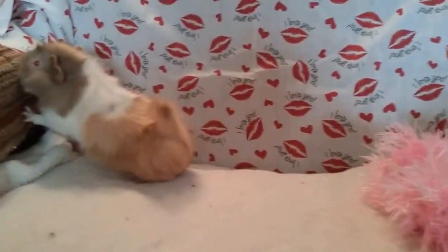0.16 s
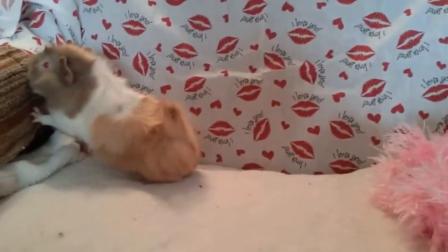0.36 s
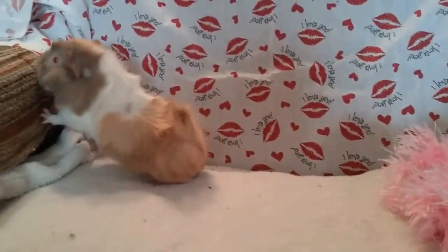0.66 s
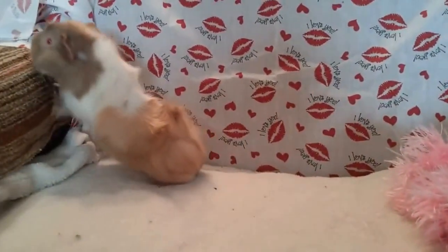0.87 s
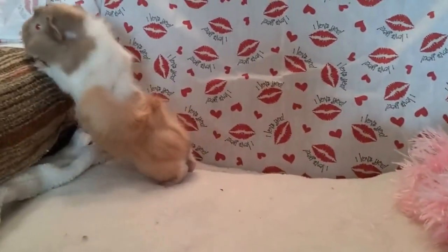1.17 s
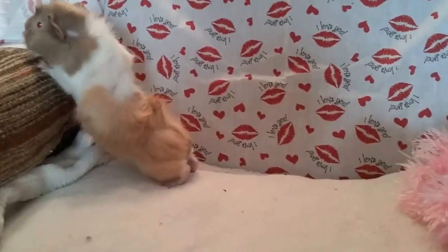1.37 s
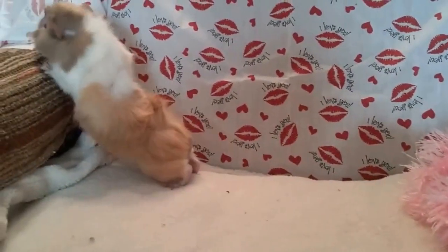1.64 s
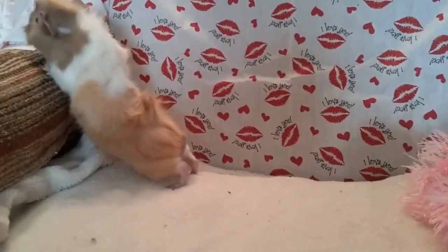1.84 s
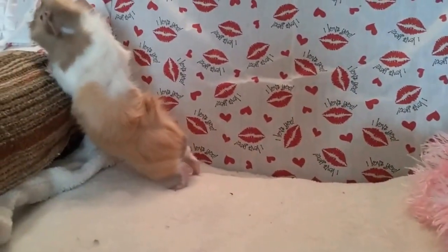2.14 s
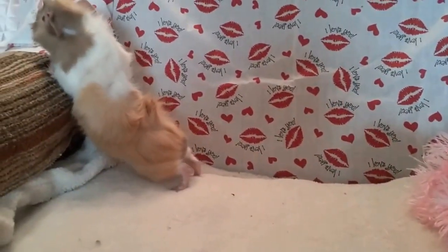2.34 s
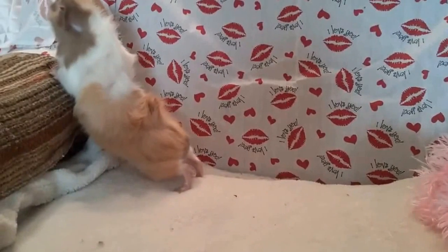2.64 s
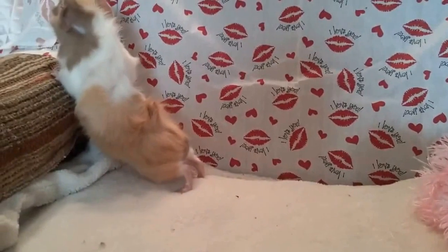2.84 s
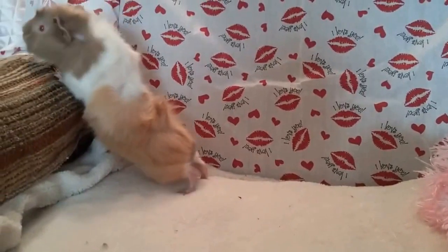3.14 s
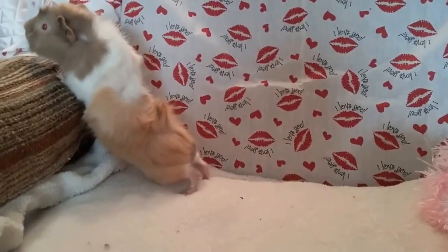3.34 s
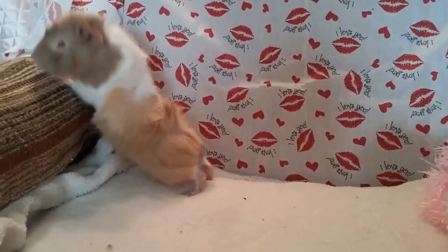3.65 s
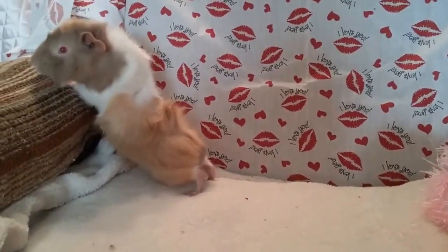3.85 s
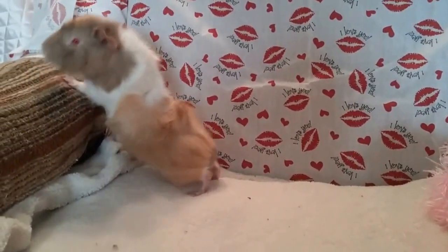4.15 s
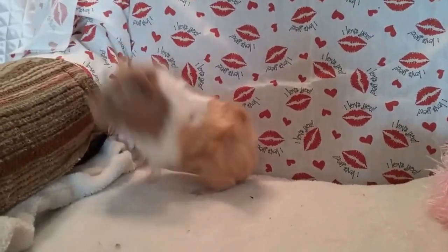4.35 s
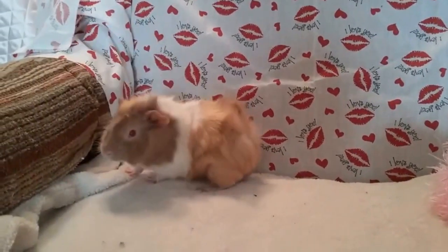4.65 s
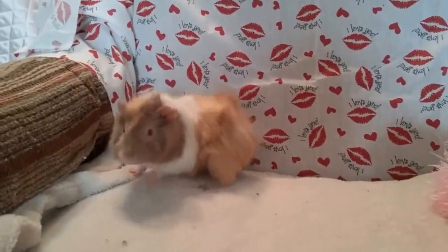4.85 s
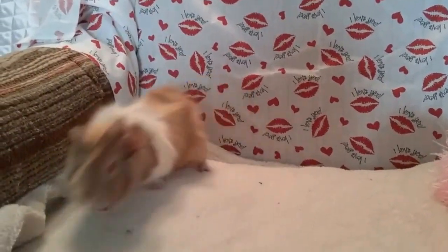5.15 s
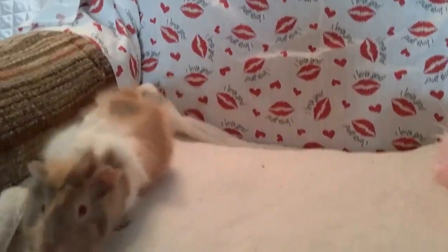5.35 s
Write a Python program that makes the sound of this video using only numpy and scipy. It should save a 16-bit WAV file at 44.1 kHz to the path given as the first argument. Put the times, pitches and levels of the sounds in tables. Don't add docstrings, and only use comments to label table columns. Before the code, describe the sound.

Close and dry, a guinea pig gives about three calls a second, some only low purring hums, others gliding up to piercing whistles. A kid goat further off bleats briefly early on, then twice at length in a fast throb mid-way, and in short bursts at the end. Claws tick and paws thump near four and a half seconds. Small soft room, phone microphone, faint hum and hiss.

```python
import sys
import numpy as np
from scipy import signal
from scipy.io import wavfile
from scipy.ndimage import uniform_filter1d

SR = 44100
rng = np.random.default_rng(int(sys.argv[2]) if len(sys.argv) > 2 else 0)


def how_loud(loudness_db):
    steps = np.asarray(loudness_db, float) / 20
    return 10 ** steps


def to_wav(sig):
    pcm = np.clip(np.atleast_2d(sig), -1, 1) * 32767
    pcm = np.round(pcm).astype(np.int16)
    wavfile.write(sys.argv[1], SR, pcm.T)


N = 242991


def curve(rows, hz):
    f, db = np.transpose(rows)
    return how_loud(np.interp(np.log(hz), np.log(f), db))


def hiss(size):
    return rng.standard_normal(size)


def band(x, lo_hz, hi_hz, order=2):
    y = signal.sosfilt(signal.butter(order, [lo_hz, hi_hz], "band", fs=SR, output="sos"), x)
    return y / np.std(y)


def walk(rate, size):
    hold = int(SR / rate)
    levels = np.repeat(hiss(size // hold + 1), hold)
    slewed = uniform_filter1d(uniform_filter1d(levels, hold), hold)
    return 1.262 * slewed[:size]


def add(out, s, x):
    i = int(s * SR)
    out[i:i + len(x)] += x[:len(out) - i]


def background(animals):
    # (f/Hz, level/dB per Hz)
    spectrum = [(15, -39), (25, 2), (117, -12), (180, -16.5), (229, -6), (309, -4.5), (463, -17),
                (2350, -25), (4870, -32), (14800, -30.5), (16000, -38)]
    # (t/s, rumble rise/dB, width/s)
    knocks = [
        (.03, 9, 0.028),
        (.2, 10, 0.019),
        (.74, 2.5, 0.17),
        (3.388, 1, 0.1),
        (4.191, 10.5, 0.061),
        (4.29, 3.5, 0.062),
        (4.62, 12, 0.066),
        (5.39, 14, 0.056),
        (5.51, 7, 0.034),
    ]
    rumble_base_db, rumble_duck_db = -44, 7
    hiss_base_db, hiss_duck_db = -55.5, 13.5
    gate_shut_db, gate_range_db, gate_s = -74, 10, 0.025
    hum_hz, hum_db = 175, -6

    t = np.arange(N) / SR
    width = int(gate_s * SR)
    heard_db = 10 * np.log10(np.abs(uniform_filter1d(animals ** 2, width)) + 1e-12)
    shut = uniform_filter1d(np.clip(3.5 - (heard_db - gate_shut_db) / gate_range_db, 0, 1), width)
    rumble_db = rumble_base_db - rumble_duck_db * shut
    rumble_db += sum(db * np.exp(-((t - s) / w) ** 2) for s, db, w in knocks)

    motor = np.sin(2 * np.pi * hum_hz * t + 1.8 * walk(30, N))
    out = how_loud(rumble_db + hum_db + 2.62 * walk(25, N)) * motor
    for hz in 35 * 2 ** np.arange(0, 9, .5):
        if hz < 270:
            gate_db = rumble_db + 20.5
        else:
            duck_share = 0.98 if hz > 3000 else 1
            gate_db = hiss_base_db - hiss_duck_db * shut * duck_share + 29
        noise = band(hiss(N), hz / 0.99, hz * 1.315)
        out += how_loud(gate_db - 47 + 4.0 * walk(17, N)) * curve(spectrum, hz) * np.sqrt(hz) * noise
    return out


def paws():
    # (t/s, peak level/dB, ring f/Hz, snap level/dB)
    ticks = [
        (0.315, -32, 1940, -17),
        (0.496, -24.5, 2760, -41),
        (0.979, -29.5, 2600, -19),
        (1.281, -39, 2290, -40),
        (3.515, -28.5, 3110, -28),
        (4.249, -24.5, 700, -35),
        (4.563, -18, 1120, -36),
        (4.58, -13.5, 700, -27),
        (4.815, -27.5, 496, 7),
    ]
    # (t/s, peak level/dB, f/Hz, t60/s)
    thumps = [(0, -37, 2450, 0.095), (0.318, -53, 2760, 0.35), (.97, -42.5, 3520, 0.075),
              (3.321, -53.5, 3270, 1), (4.561, -62, 1200, 0.12), (4.191, -33.5, 166.2, 0.2),
              (4.253, -46, 108, 0.15), (4.565, -30, 312, 0.16), (4.612, -30.5, 75, 0.35),
              (5.369, -27.5, 192, 0.11), (5.392, -50, 119, .15)]
    snap_s, ring_s = .0012, .0016
    out, t = np.zeros(N), np.arange(SR // 3) / SR
    for s, db, hz, snap_db in ticks:
        snap = hiss(len(t)) * np.exp(-t / snap_s)
        ring = np.sin(2 * np.pi * hz * t) * np.exp(-t / ring_s)
        add(out, s, how_loud(db) * (how_loud(snap_db) * snap + ring))
    for s, db, hz, t60 in thumps:
        body = band(hiss(len(t)), hz / 1.27, hz * 1.24)
        rise = 1 - np.exp(-t / (0.014 * t60))
        add(out, s, how_loud(db) * body * rise * np.exp(-t * np.log(1000) / t60))
    return out


def phrase(start, hum, glide, whistle, last_hz, hum_hz, hum_db, top_db, lead, tilt_db, turn_hz, bend, whistle_db):
    creep_oct_per_s, glide_bend = 3.2, 0.4
    onset_db, swell_s, fade_db_per_s = -2.5, 0.06, 163
    hum_tilt_db = -24
    whistle = max(whistle, 1e-3)
    knots = np.cumsum([0, hum, glide, whistle])
    t = np.linspace(0, knots[-1], num=60)
    in_whistle = t - knots[2]

    knee_hz = min(last_hz, turn_hz)
    steps = np.array([1, 2 ** (creep_oct_per_s * hum), knee_hz / hum_hz]) ** glide_bend
    octaves = np.log2(np.interp(t, knots[:3], steps)) / glide_bend
    octaves += np.log2(last_hz / knee_hz) * np.clip(in_whistle / whistle, 0, 1) ** bend

    loudest = knots[-1] - lead
    db = hum_db + onset_db * np.clip(1 - t / hum, 0, 1)
    db += (top_db - hum_db) * np.clip(1 + (t - loudest) / swell_s, 0, 1)
    db -= fade_db_per_s * np.clip(t - loudest, 0, None)

    opened = last_hz > turn_hz
    tilt = np.interp(t, knots, [tilt_db + hum_tilt_db, tilt_db + hum_tilt_db / 2, tilt_db, tilt_db])
    tilt += opened * (whistle_db - tilt_db) * np.clip(in_whistle / 0.0071, 0, 1)
    purr = np.interp(t, knots, [-1.5, -1.5, -17.5, -28.5])
    return np.transpose([start + t, hum_hz * 2 ** octaves, db, tilt, purr])


def wheek(rows, lips_hz):
    # (f/Hz, level/dB)
    snout = [(800, -0.5), (1600, 4), (2600, 2.5), (4000, 3.5), (6000, 4.5), (8500, -10.5), (12000, -11),
             (15000, 1)]
    flick_s, start_s, end_s = .007, .008, .011
    s, *columns = np.transpose(rows)
    t = np.arange(s[0], s[-1] + 0.015, 1 / SR)
    size = len(t)
    _, db, tilt_db, purr_db = (np.interp(t, s, c) for c in columns)
    hz = uniform_filter1d(np.exp(np.interp(t, s, np.log(columns[0]))), size=500, mode="nearest")
    high = np.clip((hz - 1800) / 900, 0, 1)
    flick = high * np.clip((t - s[-1]) / flick_s, 0, 1) ** 2
    waver = .008 * walk(45, size) + .006 * walk(200, size)
    jitter = .016 * np.clip((1300 - hz) / 500, 0, 1) * walk(155, size)
    hz = hz * (1 + 0.15 * flick + waver + jitter)
    phase = 2 * np.pi * np.cumsum(hz) / SR

    voice = np.sin(phase)
    mouth = np.clip((hz - 2150) / 200, .03, 1)
    bright = np.clip((hz - lips_hz) / 250 + .5, .1, 1) ** 2
    for k in np.arange(1.5, 9, .5):
        by_mouth = bright ** (k / 2) * how_loud(tilt_db * (k - 1) ** 0.22)
        by_nose = how_loud(tilt_db / 4 - 2.8 * k) / (1 + (k * hz / 2500) ** 10)
        passed = how_loud(4.5 * walk(40.6, size)) * np.maximum(by_mouth, by_nose)
        share = 1 if k % 1 == 0 else how_loud(purr_db - 1) * np.clip((1000 - hz) / 300, 0, 1)
        voice += (k * hz < 16000) * share * passed * curve(snout, k * hz) * np.sin(k * phase)

    breath = (1 - 1.24 * high) * how_loud(purr_db - 8) * band(hiss(size), 220, 2500, order=5)
    edges = np.clip(np.minimum((t - t[0]) / start_s, (t[-1] - t) / end_s), 0, 1)
    db = db - 8 * np.clip((hz - 1300) / 800, 0, 1) * (1 - mouth)
    flutter_db = 1.5 * walk(90, size)
    return np.sqrt(2) * how_loud(db + flutter_db - 1.6 * flick) * edges * (voice + breath)


def guinea_pig():
    # (start t/s, hum/s, glide/s, whistle/s, last pitch f/Hz)
    wheeks = [(.105, 0.038, 0.089, 0.00092, 1003), (.43, 0.049, 0.084, .001, 974),
              (.76, 0.068, 0.11, 0.042, 3130), (1.104, .1, .045, .001, 1470),
              (1.394, 0.05, 0.043, .001, 884), (1.635, .075, 0.12, 0.08, 2890),
              (2.028, 0.041, 0.089, 0.091, 2900), (2.39, 0.052, 0.034, .001, 1080),
              (2.57, 0.084, 0.095, 0.093, 3060), (2.96, 0.053, 0.14, .04, 2798),
              (3.31, .075, .075, .001, 1654), (3.63, 0.078, 0.037, .001, 886),
              (3.94, 0.066, 0.035, 0.0015, 958), (4.19, 0.09, .07, 0.032, 2790),
              (4.45, .07, .086, 0.13, 3108), (4.905, .075, 0.076, 0.088, 2962),
              (5.3, .015, .12, .056, 2752)]
    # (hum f/Hz, hum level/dB, loudest level/dB, loudest before the end/s, overtone tilt of
    # the glide/dB at twice the pitch)
    voices = [(516, -49, -48.5, 0.023, -2), (530, -48, -46, .01, -1), (568, -43, -41.5, 0.056, -4),
              (575, -48, -44.5, 0.05, -9), (530, -49, -46, 0.013, -17), (585, -48, -19.5, 0.03, 17),
              (575, -38, -20.5, 0.077, -9), (657, -36, -46.5, 0.037, 42), (648, -41.5, -13.5, 0.063, -5),
              (575, -39, -26, 0.022, -3.5), (490.7, -46, -42.5, 0.041, 30.5),
              (490.7, -49, -45.5, 0.0045, 32), (490, -50, -42, 0.017, 36), (514, -42.5, -45.5, 0.024, -11),
              (472, -41, -22, 0.031, 9), (584, -41.5, -29, 0.014, 0.5), (702, -37.5, -18, 0.052, -3)]
    # (f/Hz where the glide turns to a whistle, bend of the whistle [under 1 = levels off],
    # f/Hz where the lips part, overtone tilt of the whistle/dB at twice the pitch)
    mouths = [(2250, 1, 1900, -11), (2250, 1, 1900, -11), (2220, 0.99, 2500, -15), (2250, 1, 1900, -11),
              (2250, 1, 1900, -11), (2300, 0.38, 2396, -14.5), (2188, 1.7, 1450, -18), (2250, 1, 1900, -11),
              (2300, .42, 2200, -12.5), (2600, 1, 1270, -12), (2250, 1, 1900, -11), (2250, 1, 1900, -11),
              (2250, 1, 1900, -11), (2214, 1.05, 1740, -19), (2025, .85, 1986, -3.5),
              (2080, .9, 1690, -2.5), (2325, .9, 1050, -14.5)]
    out = np.zeros(N)
    for call, voice, (turn_hz, bend, lips_hz, whistle_db) in zip(wheeks, voices, mouths):
        add(out, call[0], wheek(phrase(*call, *voice, turn_hz, bend, whistle_db), lips_hz))
    return out


def resonance(hz, centre_hz, width_hz):
    return 1 / np.sqrt(1 + ((hz ** 2 - centre_hz ** 2) / (hz * width_hz)) ** 2)


def bleat(throbs, rise, fall, sag_up, sag_down, hold, dip_db, tongue_db, palate_db, treble_db, rough):
    # (f/Hz, width/Hz, level/dB)
    cavities = [(2600, 700, -4), (3700, 700, -3), (5700, 1200, -2), (7600, 1500, -9), (12500, 6000, -24)]
    shape_db = [tongue_db, palate_db, treble_db, treble_db, treble_db]
    peak, pitch_hz, peak_db, jaw_hz = np.transpose(throbs)
    t = np.arange(peak[0] - rise, peak[-1] + 2 * fall, 1 / SR)
    size = len(t)
    db = np.interp(t, peak, peak_db)

    lag = t - peak[:, None]
    pushes = np.sin(np.pi / 2 * np.clip(1 - np.where(lag < 0, -lag / rise, lag / fall), 0, 1))
    push = pushes.max(0)
    falling = lag[pushes.argmax(0), np.arange(size)] > 0
    slack = uniform_filter1d(np.clip(1 - push / hold, 0, 1), size=200)
    weak = np.clip((peak_db.max() - db - 8.5) / 15, 0, 1)
    hoarse = np.clip(rough + 1.087 * slack + weak, 0, 1)
    sag = uniform_filter1d(np.where(falling, sag_down, sag_up) * slack, size=300)
    wobble = 1 + .035 * hoarse * walk(250, size) + .018 * rough * walk(40.02, size)
    pitch = np.interp(t, peak, pitch_hz) * (1 - sag) * wobble
    phase = 2 * np.pi * np.cumsum(pitch) / SR
    jaw = (1 - slack) * np.interp(t, peak, jaw_hz) + slack * 1600

    def throat(hz):
        lower = (1 + 0.66 * slack) * resonance(hz, jaw, 195) ** 1.193 * np.minimum(hz / jaw, 1) ** 4.0
        lower = lower + how_loud(-29.0) * resonance(hz, 640, 140)
        return lower + sum(how_loud(g + d) * resonance(hz, f, w) ** 2 for (f, w, g), d in zip(cavities, shape_db))

    voice = 0
    for k in range(1, 27):
        shimmer_db = 3.1 * walk(15.2, size) + 8 * rough * walk(70, size)
        shimmer_db -= (2.9 * rough + .5 * slack) * k
        voice = voice + how_loud(shimmer_db) * throat(k * pitch) * np.cos(k * phase + .13 * k * k)
    voice = voice * (1 - 0.6 * hoarse)
    for hz in 900 * 2 ** np.arange(0, 4.1, 1 / 3):
        puff = (1 + np.cos(phase)) * band(hiss(size), hz / 1.13, hz * 1.13)
        voice = voice + .17 * hoarse * (hz / 2600) ** .75 * throat(hz) * puff

    edges = np.clip(np.minimum((t - t[0]) / (0.91 * rise), (t[-1] - t) / fall), 0, 1)
    effort = edges * (how_loud(dip_db) + (1 - how_loud(dip_db)) * push ** 2)
    lumps_db = 7.1 * rough * walk(78.9, size)
    return t[0], how_loud(db + lumps_db) * effort * voice


def kid_goat():
    # (peak t/s, pitch f/Hz, level/dB, jaw resonance f/Hz)
    bleats = [
        [(.582, 637, -24.5, 640), (.69, 629, -16, 1230), (.775, 573, -31.5, 1510)],
        [(2.198, 665, -19.5, 1380), (2.295, 654.2, -13, 1710), (2.395, 673.7, -15, 1750),
         (2.498, 686.7, -16.5, 1580), (2.603, 666.6, -16, 1710), (2.706, 671.6, -16, 1620)],
        [(3.575, 497, -34, 567), (3.655, 593.3, -11.5, 1606), (3.75, 596.2, -11, 1734),
         (3.85, 590, -12.5, 1640), (3.945, 605, -13.5, 1685), (4.045, 618.4, -16, 1560)],
        [(5.12, 617, -29, 1400), (5.215, 629, -22.5, 1426)],
        [(5.28, 420.3, -33, 454)],
        [(5.467, 615.6, -15.5, 2300)],
    ]
    # (rise/s, fall/s, pitch sag before [0-1], pitch sag after [0-1],
    # effort that holds the pitch [0-1])
    breaths = [(.05, .03, .25, 0.4, 1.01), (.052, .029, 0.03, 0.1, 1), (.052, .043, 0.06, 0.2, .85),
               (.04, .045, .08, 0.3, 1), (.03, 0.0327, 0, .02, .6), (0.0068, 0.014, .05, 1, 0.99)]
    # (dip between throbs/dB, tongue/dB, palate/dB, treble/dB)
    manners = [(-17, -8, -33.5, -7.5), (-8.5, -23.5, -3, -5.5), (-10.5, -16, -5, -3.5),
               (-8.5, -11.5, -17, -5.5), (2, -31, -17, -31), (-31, -35, -13.5, 4)]
    roughness = [.05, .08, .26, .36, .08, .35]
    out = np.zeros(N)
    for throbs, breath, manner, rough in zip(bleats, breaths, manners, roughness):
        add(out, *bleat(throbs, *breath, *manner, rough))
    return out


def walls(x):
    low_t60_s, treble_t60_s, first_echo_s = 0.24, 0.14, 0.0019
    t = np.arange(SR // 2) / SR
    low = band(hiss(len(t)), 110, 4630)
    treble = 1.82 * band(hiss(len(t)), 5250, 15100)
    tail = low * np.exp(-t * np.log(1000) / low_t60_s)
    tail += treble * np.exp(-t * np.log(1000) / treble_t60_s)
    tail *= np.clip(t / first_echo_s - 1, 0, 1)
    return signal.fftconvolve(x, tail / np.sqrt(np.sum(tail ** 2)))[:N]


def scene():
    near = guinea_pig() + paws()
    kid = kid_goat()
    room = walls(how_loud(-8.5) * near + how_loud(-3) * kid)
    animals = near + how_loud(3.0) * kid + room
    return (animals + background(animals))[None]


def top_cut(x):
    return signal.sosfilt(signal.butter(12, 16270, fs=SR, output="sos"), x)


def record(dry):
    mix = signal.sosfilt(signal.butter(7, 58, "high", fs=SR, output="sos"), dry)
    mix = .8 * np.tanh(mix / .8)
    mix = signal.sosfilt(signal.ellip(10, .2, 70, 15900, fs=SR, output="sos"), mix)
    return top_cut(mix)


dry = scene()
out = record(dry)
to_wav(out)
```